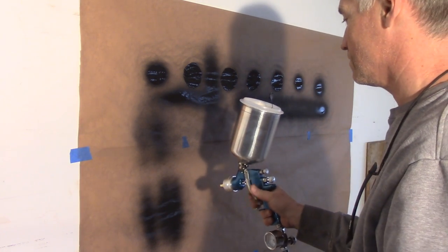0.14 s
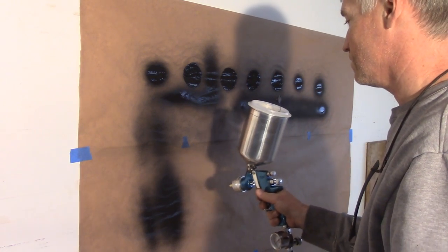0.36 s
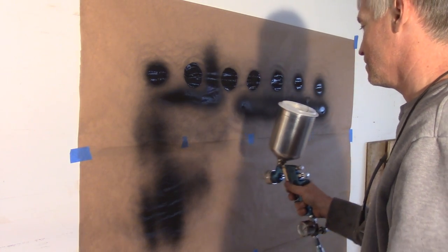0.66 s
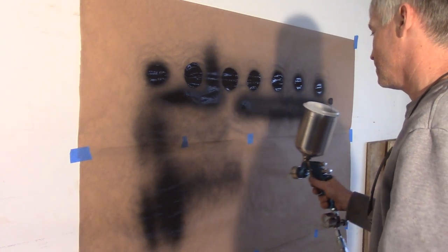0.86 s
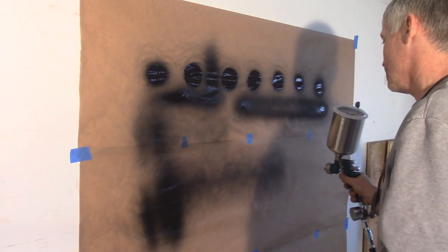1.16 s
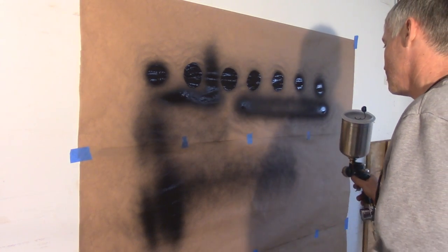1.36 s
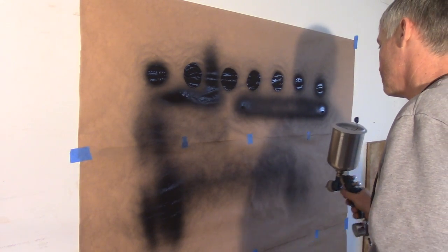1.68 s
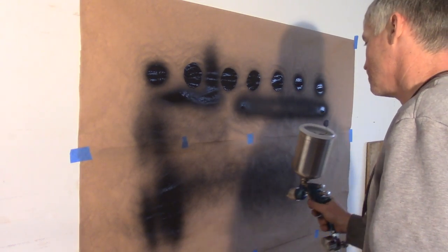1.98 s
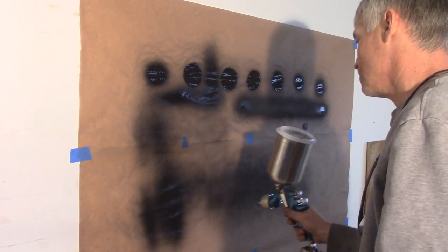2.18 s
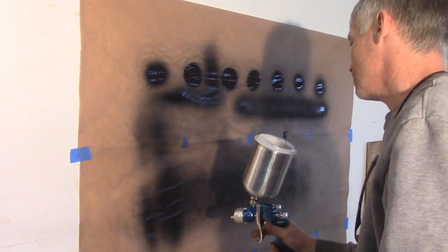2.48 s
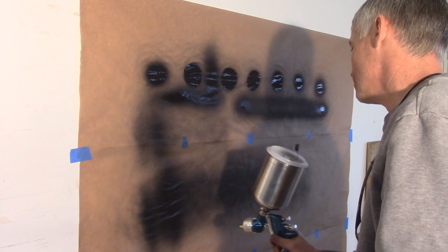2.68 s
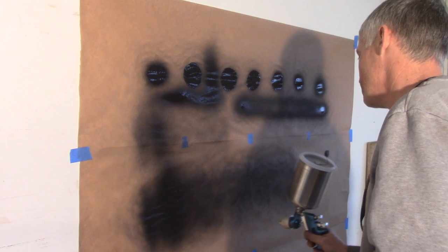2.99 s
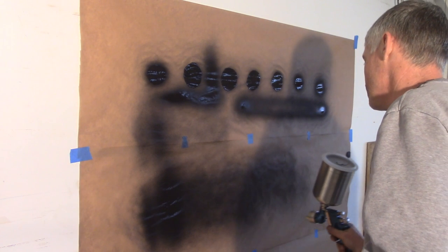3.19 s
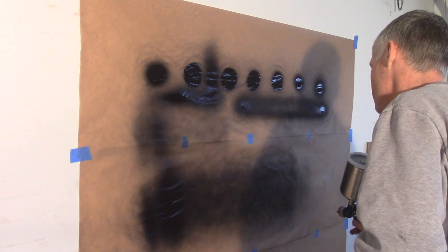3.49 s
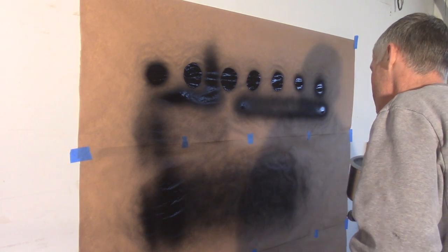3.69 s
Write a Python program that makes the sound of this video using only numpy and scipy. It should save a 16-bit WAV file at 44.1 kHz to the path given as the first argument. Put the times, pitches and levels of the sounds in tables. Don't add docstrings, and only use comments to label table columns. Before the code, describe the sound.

Spray gun close to the microphone in a live garage: three loud airy hisses, each opening with a sharp rising burst and ending in a low thump, with metallic trigger clicks in the short gaps.

```python
import sys
import numpy as np
from scipy import signal
from scipy.fft import rfft, irfft, next_fast_len
from scipy.io import wavfile
from scipy.ndimage import uniform_filter1d

SR = 44100
rng = np.random.default_rng(int(sys.argv[2]) if len(sys.argv) > 2 else 0)


def invert_db(x):
    u = np.asarray(x, float) / 20
    return 10 ** u


def materialize(psi):
    bounded = np.clip(np.atleast_2d(psi).T, -1, 1)
    quanta = np.round(bounded * 32767).astype(np.int16)
    wavfile.write(sys.argv[1], SR, quanta)


N = 169785


def evened(x):
    return x / np.sqrt(np.mean(x ** 2) + 1e-20)


def read(points, hz):
    f, value = np.transpose(points)
    return np.interp(np.log(hz + 1), np.log(f + 1), value)


def coloured(x, points):
    size = next_fast_len(len(x) + 4096)
    gain = invert_db(read(points, np.fft.rfftfreq(size, 1 / SR)))
    return irfft(rfft(x, size) * gain, size)[:len(x)]


def add(mix, s, sound):
    part = mix[round(s * SR):][:len(sound)]
    part += sound[:len(part)]


def resonate(x, hz, width_hz):
    turn = np.exp(2j * np.pi * np.cumsum(hz * np.ones(len(x))) / SR)
    r = np.exp(-np.pi * width_hz / SR)
    return 2 * (turn * signal.lfilter([1 - r], [1, -r], x / turn)).real


def wander(top_hz):
    slow = signal.butter(2, min(top_hz, 2000), fs=SR)
    return evened(signal.lfilter(*slow, rng.standard_normal(N + SR))[SR:])


def turbulence(points, patchy_db, gust_db):
    a, b, patches = rng.standard_normal((N // 128 + 6, 257, 3)).T
    patches = uniform_filter1d(patches, size=6, axis=0)
    patches = evened(uniform_filter1d(patches, size=25, axis=1))
    steady_low = np.minimum(np.arange(257) / 8, 1)[:, None]
    colour_db = read(points, np.fft.rfftfreq(512, 1 / SR))[:, None]
    z = (a + 1j * b) * invert_db(colour_db + patchy_db * patches * steady_low)
    noise = evened(signal.istft(z, nperseg=512, noverlap=384)[1][:N])
    return noise * invert_db(gust_db * wander(top_hz=24.3))


# frequency in Hz, level in dB per Hz.
HUM = [(18, -64), (30, -24), (124, -14), (174, -15.5), (355, -9), (394, -10.5), (2480, -23), (11400, -44),
       (16000, -49)]
HUM_DB = -50


def still_air():
    murmur = evened(coloured(rng.standard_normal(N), HUM))
    return invert_db(HUM_DB) * murmur * invert_db(0.5 * wander(top_hz=30))


# frequency in Hz, reverberation time t60 in seconds.
GARAGE_T60 = [(150, 0.57), (400, 1), (1000, 1), (2800, 0.94), (6000, 0.63), (9000, 0.48), (13000, 0.36),
              (16000, 0.2)]
SHIFT_S = .045


def garage(x, count):
    taps = np.zeros((count, 3 * SR // 4))
    at = np.arange(200, taps.shape[1] - 20, 20)
    places = at + rng.integers(0, 20, (count, len(at)))
    signs = rng.choice([-1., 1.], (count, len(at)))
    np.put_along_axis(taps, places, signs, 1)
    hz, t, z = signal.stft(taps, SR, nperseg=256)
    decay = invert_db(-60 * t / read(GARAGE_T60, hz)[:, None])
    tails = signal.istft(z * decay, SR, nperseg=256)[1]
    tails = tails / np.linalg.norm(tails, axis=1)[:, None]
    place = (np.arange(N) / SR / SHIFT_S - np.arange(count)[:, None]) % count - 1
    turns = np.cos(np.pi / 2 * np.clip(place, -1, 1))
    return signal.fftconvolve(x * turns, tails, axes=1).sum(0)[:N]


# frequency in Hz, level in dB, decay time t60 in seconds.
CUP = [(2650, -59, 0.26), (4940, -54, 0.34), (8700, -68, .3)]


def paint_cup():
    out, t = np.zeros(N), np.arange(SR // 2) / SR
    for hz, db, t60 in CUP:
        mode = evened(resonate(rng.standard_normal(len(t)), hz, 60))
        add(out, 0, invert_db(db - 60 * t / t60) * mode)
    return out


# start in seconds, level in dB, knock pitch in Hz, ping pitch in Hz,
# ping against knock in dB.
CLICKS = [(.001, -35.5, 2650, 4930, -4), (1.51, -17, 984, 13500, -5), (1.510, -23, 1710, 7400, 0),
          (1.518, -25, 2150, 14100, 6), (2.621, -11.5, 2580, 10600, -30), (2.625, -31, 2800, 14300, -6.5),
          (2.470, -14.5, 2650, 9000, -20), (2.476, -20, 2650, 9000, -20), (3.809, -20.5, 970, 7540, 0.5),
          (3.812, -28, 1900, 9300, -13), (3.821, -33, 4500, 14200, -3)]
KNOCK_WIDTH_HZ, PING_WIDTH_HZ = 240, 720
RATTLE_S, RATTLE_DB = 0.0012, 3.5
SETTLE_DB, SETTLE_S = -11, .014


def trigger():
    out, t = np.zeros(N), np.arange(2600) / SR
    strike = t / RATTLE_S * np.exp(1 - t / RATTLE_S)
    settling = invert_db(SETTLE_DB) * np.minimum(t / RATTLE_S, 1) * np.exp(-t / SETTLE_S)
    shape = strike + settling
    for s, db, knock_hz, ping_hz, ping_db in CLICKS:
        hiss = rng.standard_normal(len(t))
        rattle = signal.lfilter(*signal.butter(2, 700, "high", fs=SR), hiss * shape)
        blow = 1.8 * shape * np.sin(2 * np.pi * knock_hz * t) * (t < 2 * RATTLE_S)
        knock = resonate(rattle + blow, knock_hz, KNOCK_WIDTH_HZ)
        knock = resonate(knock, knock_hz, 700)
        ping = resonate(rattle, ping_hz, PING_WIDTH_HZ)
        click = knock / abs(knock).max() + invert_db(ping_db) * ping / abs(ping).max()
        add(out, s, invert_db(db) * (click + invert_db(RATTLE_DB) * rattle / 4))
    return out


# centre in seconds, level in dB, pitch in Hz.
THUMPS = [
    (1.346, -22.5, 290),
    (1.3554, -18, 197),
    (1.572, -30, 190),
    (2.481, -18.5, 290),
    (2.496, -25, 200),
    (3.610, -22, 275),
    (3.620, -21.5, 190),
    (2.668, -35, 200),
]
PUSH_CYCLES = .78


def valve():
    out = np.zeros(N)
    for s, db, hz in THUMPS:
        cycles = np.arange(-600, 900) / SR * hz
        push = np.cos(2 * np.pi * cycles) * np.exp(-(cycles / PUSH_CYCLES) ** 2)
        add(out, s - 600 / SR, invert_db(db) * push)
    return signal.lfilter(*signal.butter(1, 70, "high", fs=SR), out)


# valve opens in seconds, valve shuts in seconds, closing time in seconds,
# opening burst in dB, burst length in seconds.
PASSES = [
    (0.213, 1.352, 0.052, 6, 0.013),
    (1.553, 2.47, 0.01, 7, 0.017),
    (2.6503, 3.598, 0.059, 7, 0.0086),
]
OPEN_S = 0.0083
PAINT_DELAY_S, PAINT_RISE_S = .025, .05


def flow(t):
    air, burst, paint = np.zeros((3, N))
    for opens, shuts, closing, burst_db, burst_s in PASSES:
        opening = np.clip((t - opens) / OPEN_S, 0, 1) ** 2
        gate = opening * np.clip(1 - (t - shuts) / closing, 0, 1) ** 2
        since = np.maximum(t - opens - OPEN_S, 0)
        air += gate
        burst += gate * invert_db(burst_db) * np.exp(-(since / burst_s) ** 4)
        paint += gate * np.clip((since - PAINT_DELAY_S) / PAINT_RISE_S, 0, 1)
    return air, burst, paint


BURST_HZ, BURST_WIDTH_HZ = 8850, 940
GLIDE_HZ_PER_S = 70000


def opening_burst(jet, t):
    opened = t - np.array(PASSES)[:, :1]
    latest = np.where(opened > 0, opened, np.inf).min(0)
    glide_hz = BURST_HZ + GLIDE_HZ_PER_S * np.minimum(latest - OPEN_S, .02)
    whistle = evened(resonate(jet, glide_hz, BURST_WIDTH_HZ))
    partial = evened(resonate(jet, 1.5 * BURST_HZ, BURST_WIDTH_HZ))
    edge = evened(np.diff(jet, prepend=0))
    return (whistle + 0.35 * partial + .4 * edge) / 2


CAP_DB, CAP_WIDTH_HZ, CAP_FLUTTER_DB = -23.5, 3700, 4.5


def air_cap(aim_db, cap_hz):
    cap = resonate(rng.standard_normal(N), cap_hz, CAP_WIDTH_HZ)
    cap = evened(resonate(cap, cap_hz, CAP_WIDTH_HZ))
    return invert_db(CAP_DB + aim_db + CAP_FLUTTER_DB * wander(top_hz=85)) * cap


# frequency in Hz, level in dB per Hz.
PAINT = [(70, -49), (330, -16), (600, 4), (900, -8.5), (1800, -4), (4200, 5), (6000, 5), (12000, -13)]
PAINT_DB = -23.5


def paint_spray():
    return invert_db(PAINT_DB) * turbulence(PAINT, patchy_db=1.2, gust_db=.9)


# frequency in Hz, level in dB per Hz.
JET = [(24, -73), (40, -62), (249, -17), (600, -16.5), (1150, -13.5), (2000, -9), (2700, -8), (8130, -3.5),
       (16000, -8)]
JET_DB, JET_LOW_HZ = -13.5, 227
JET_FOLLOWS = .35
# time in seconds, level in dB,
# air cap resonance in Hz.
AIM = [
    [(0.26, -13.5, 8300), (0.352, -12.5, 8500), (0.53, -18.5, 8800), (0.71, -13, 7800), (1.33, -18.5, 8290)],
    [(1.6, -17, 8500), (1.966, -15, 8120), (2.3, -15.5, 8150), (2.436, -19, 8400), (2.46, -14.5, 8200)],
    [(2.7, -10, 8800), (2.706, -12, 8470), (2.838, -14, 8150), (3.552, -17, 8200), (3.59, -18, 8040)],
]


def gun():
    t = np.arange(N) / SR
    air, burst, paint = flow(t)
    s, aim_db, cap_hz = np.concatenate(AIM).T
    aim_db, cap_hz = np.interp(t, s, aim_db) + 19, np.interp(t, s, cap_hz)
    jet = turbulence(JET, patchy_db=1.9, gust_db=-0.6)
    x = air * (invert_db(JET_DB + JET_FOLLOWS * aim_db) * jet + air_cap(aim_db, cap_hz))
    x += invert_db(JET_DB) * burst * opening_burst(jet, t)
    x += paint * paint_spray()
    return signal.lfilter(*signal.butter(1, JET_LOW_HZ, "high", fs=SR), x)


# frequency in Hz, side against mid in dB.
WIDE = [(60, -15), (110, -14.5), (200, -15.5), (380, -14), (700, -20.5), (1290, -27), (2380, -18),
        (4400, -15.5), (8120, -14.5), (15000, -10)]
GARAGE_DB, THUMP_ROOM_DB = -5.5, 1


def scene():
    near, thumps = gun() + trigger() + paint_cup(), valve()
    far = near + invert_db(THUMP_ROOM_DB) * thumps
    near = near + thumps
    mid = near + invert_db(GARAGE_DB) * garage(far, count=14) + still_air()
    leak = 0.51 * uniform_filter1d(near, size=30)
    side = coloured(leak + invert_db(-4.0) * garage(far, count=3) + still_air(), WIDE)
    return np.array([mid + side, mid - side])


def band_limit(x):
    return signal.sosfilt(signal.butter(12, 15800, fs=SR, output="sos"), x)


LIMIT_DB, RECOVER_DB_PER_S = -12.5, 85
CLIP = .85
MIC_LOW_HZ, TOP_CUT_HZ = 55, 15860


def record(dry):
    power = signal.lfilter([.003], [1, -.997], (dry ** 2).mean(0))
    power_db = 10 * np.log10(abs(power) + 1e-12)
    fall = np.arange(N) * RECOVER_DB_PER_S / SR
    peak_db = np.maximum.accumulate(power_db + fall) - fall
    over_db = np.maximum(peak_db - LIMIT_DB, 0)
    held = dry / invert_db(0.22 * uniform_filter1d(over_db, size=300))
    low_cut = signal.butter(1, MIC_LOW_HZ, "high", fs=SR, output="sos")
    held = signal.sosfilt(low_cut, np.clip(held, -CLIP, CLIP))
    top_cut = signal.firwin(401, TOP_CUT_HZ, window=("kaiser", 9), fs=SR)
    mix = signal.oaconvolve(held, top_cut[None], "same")
    return band_limit(mix)


dry = scene()
out = record(dry)
materialize(out)
```